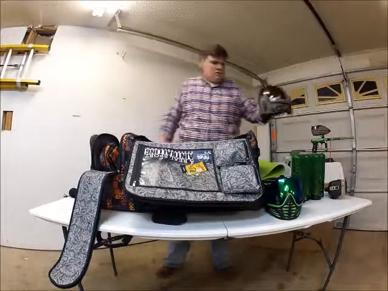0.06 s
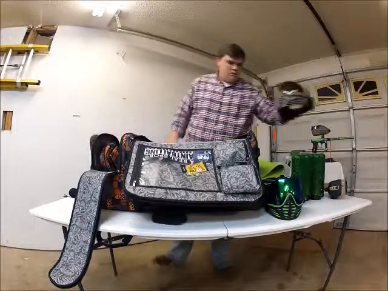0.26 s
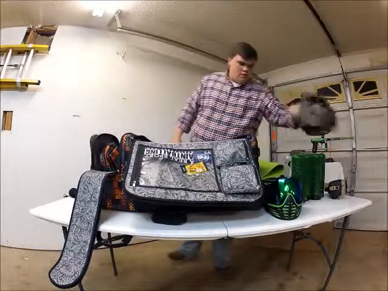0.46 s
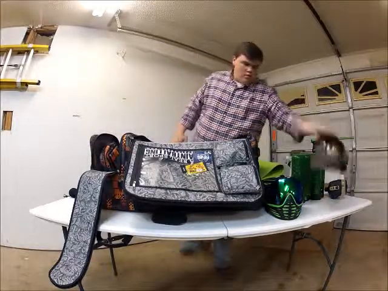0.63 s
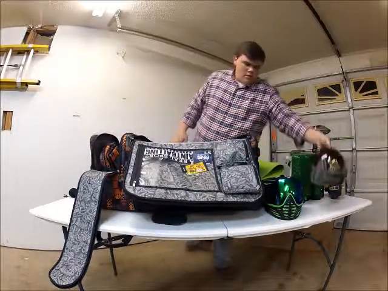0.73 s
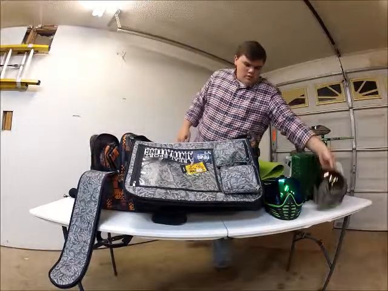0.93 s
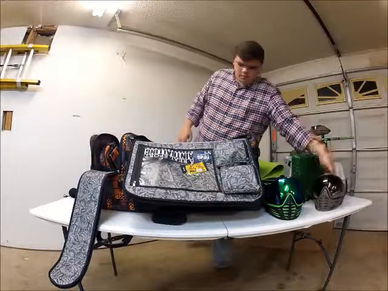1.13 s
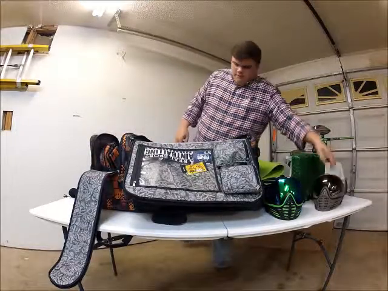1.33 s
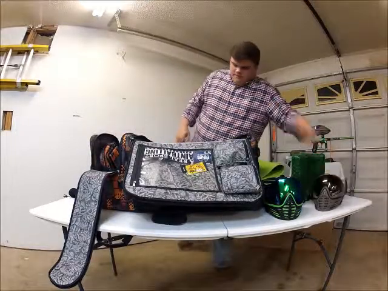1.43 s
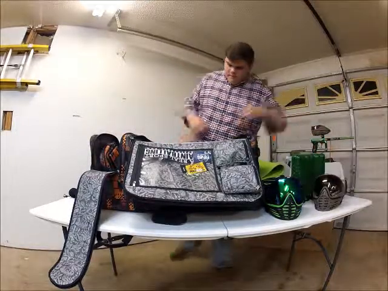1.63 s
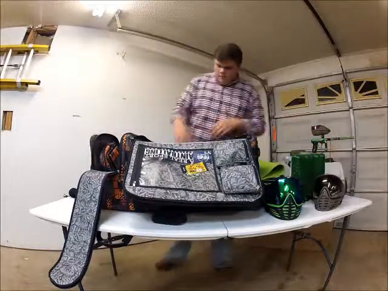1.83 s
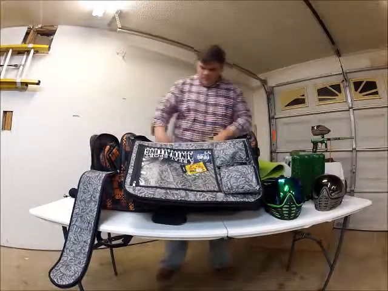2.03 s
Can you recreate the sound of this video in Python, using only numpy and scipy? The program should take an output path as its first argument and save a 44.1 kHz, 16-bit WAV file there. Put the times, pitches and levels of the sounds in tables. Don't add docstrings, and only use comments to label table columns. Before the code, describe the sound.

Single sharp clack and deep hollow boom as a plastic shell is set on a table.

```python
import sys
import numpy as np
from scipy import signal
from scipy.fft import rfft, irfft, next_fast_len
from scipy.io import wavfile
from scipy.ndimage import uniform_filter1d

SR = 44100
rng = np.random.default_rng(int(sys.argv[2]) if len(sys.argv) > 2 else 0)


def nominal_scale(level):
    x = np.asarray(level, float) / 20
    return 10 ** x


def bounce(signal):
    frames = np.transpose(np.atleast_2d(signal))
    limited = np.clip(frames, -1, 1)
    pcm = np.round(limited * 32767).astype(np.int16)
    wavfile.write(sys.argv[1], SR, pcm)


N = 91287


def read(points, hz):
    f, value = np.transpose(points)
    return np.interp(np.log(hz + 1), np.log(f + 1), value)


def evened(x):
    return x / np.sqrt(np.mean(x ** 2) + 1e-20)


def since(start_s):
    return np.maximum(np.arange(N) / SR - start_s, 0)


def ring(t, pitch_hz, level_db, t60_s):
    return nominal_scale(level_db - 60 * t / t60_s) * np.sin(2 * np.pi * pitch_hz * t)


def noise(field_db, size=512):
    frames = N * 4 // size + 5
    hz = np.fft.rfftfreq(size, 1 / SR)[:, None]
    t = np.arange(frames) * size / 4 / SR
    real, imag = rng.standard_normal((frames, len(hz), 2)).T
    spectra = (real + 1j * imag) * nominal_scale(field_db(hz, t))
    return signal.istft(spectra, nperseg=size, noverlap=size * 3 // 4)[1][:N]


def patches(hz, t, bins=6, frames=8):
    lumps = rng.standard_normal((len(t), len(hz))).T
    lumps = uniform_filter1d(lumps, int(bins), 0)
    return evened(uniform_filter1d(lumps, int(frames), 1))


# frequency_hz, density_db (per Hz)
AIR_COLOUR = [(12, -58.5), (20, 0), (248, -6), (305, -9), (367, -9), (532, -13.5), (597, -16), (992, -23.5),
              (5000, -30), (6500, -29), (11000, -120)]
# pitch_hz, level_db
HUM_PARTIALS = [(120, -72), (362, -75), (720, -81.5), (1800, -86), (2040, -86)]


def air():
    def field(hz, t):
        low_lumps = 2.7 * patches(hz, t, 6.4, 3.3) * (hz < 700)
        return read(AIR_COLOUR, hz) + low_lumps + 0.81 * patches(hz, t, 30, 12)

    rumble = nominal_scale(-58.5) * evened(noise(field, size=1024))
    t = np.arange(N) / SR
    hum = np.zeros(N)
    for pitch_hz, level_db in HUM_PARTIALS:
        waver_db = 1.86 * np.sin(2 * np.pi * (rng.uniform(1.0, 2.32) * t + rng.random()))
        hum += nominal_scale(level_db + 3.5 + waver_db) * np.sin(2 * np.pi * pitch_hz * t)
    return rumble + hum


# time_s, level_db
MOVEMENT = [(0, -59), (.1, -61), (.25, -58), (.33, -65.5), (.39, -61.5), (.46, -69.5), (.6, -69.5),
            (.8, -69), (.95, -66), (1.08, -63), (1.4, -72), (1.8, -72), (1.97, -68.5), (2.07, -61)]
# frequency_hz, density_db (per Hz)
CLOTH_COLOUR = [(300, -39.5), (800, -9.5), (1600, -12.5), (2500, -11.5), (3500, -13.5), (5000, -14.5)]


def rustle():
    def field(hz, t):
        return read(CLOTH_COLOUR, hz) - 30 * (hz < 200) + 1.5 * patches(hz, t, 5, 10)

    level_db = np.interp(np.arange(N) / SR, *np.transpose(MOVEMENT))
    return nominal_scale(level_db) * evened(noise(field))


# start_s, level_db, pitch_hz, t60_s
SOFT_KNOCKS = [
    (.118, -43.5, 246, 0.052),
    (1.937, -49.5, 236, 0.15),
    (2.0249, -39.5, 164, 0.14),
    (2.026, -41.5, 293, 0.088),
    (2.031, -42, 231, 0.14),
    (2.0577, -37, 150, 0.074),
]


def knocks():
    direct = np.zeros(N)
    for start_s, level_db, pitch_hz, t60_s in SOFT_KNOCKS:
        onset = np.minimum(since(start_s) / 0.0029, 1)
        direct += onset * ring(since(start_s), pitch_hz, level_db, t60_s)
    t = np.arange(SR // 2) / SR
    room = rng.standard_normal(len(t)) * nominal_scale(-60 * t / 0.62) * (t > .006)
    room = room / np.linalg.norm(room)
    return direct + nominal_scale(-8) * signal.fftconvolve(direct, room)[:N]


# start_s, rise_s, t60_s, level_db, centre_hz
RUBS = [
    (.184, .014, .22, -61.5, 4500),
    (2.028, .008, 1.5, -62, 2330),
    (2.0255, .006, 1.5, -62, 4000),
    (.55, .4, 1.2, -73, 1550),
]
RUB_WIDTHS = [.15, .1, .45, .2]


def scuffs():
    out = np.zeros(N)
    for (start_s, rise_s, t60_s, level_db, centre_hz), width in zip(RUBS, RUB_WIDTHS):
        hiss = noise(lambda hz, t: -6 * (np.log((hz + 1) / centre_hz) / width) ** 2, size=256)
        swell = np.minimum(since(start_s) / rise_s, 1)
        out += swell * nominal_scale(level_db - 60 * since(start_s + rise_s) / t60_s) * evened(hiss)
    return out


# start_s, level_db
RIM_CONTACTS = [
    (1.0851, -30),
    (1.0863, -30),
    (1.0874, -21),
    (1.0885, -25),
]


def ticks():
    out = np.zeros(N)
    for start_s, level_db in RIM_CONTACTS:
        t = since(start_s)
        crack = nominal_scale(level_db - 4 - 60 * t / .008) * rng.standard_normal(N)
        shell = ring(t, 1300, level_db, .006) + ring(t, 3200, level_db - 3, .006)
        out += (t > 0) * (crack - shell)
    return out


# frequency_hz, density_db (per Hz)
TAIL_COLOUR = [(300, -6), (400, -20.5), (560, -13), (750, -26), (1200, -26), (1800, -28.5), (3000, -26.5),
               (5200, -38)]
# frequency_hz, t60_s
TAIL_DECAY = [(300, 0.6), (600, 0.54), (1200, 0.58), (2500, 0.49), (5000, 0.52)]


def tail():
    start_s = RIM_CONTACTS[0][0]

    def field(hz, t):
        decay_db = -60 * np.maximum(t - start_s, 0) / read(TAIL_DECAY, hz)
        bass_lag_db = -13.5 * (hz < 480) * (t < start_s + .025)
        return read(TAIL_COLOUR, hz) - 40 * (hz < 250) + decay_db + bass_lag_db + patches(hz, t, 10, 3.5)

    diffuse = noise(field)
    diffuse = diffuse / np.sqrt(np.mean(diffuse[round(start_s * SR):][:2000] ** 2))
    t = since(start_s)
    rise = np.minimum(t / 0.0044, 1)
    early = 1 + nominal_scale(-39 - 60 * t / 0.064)
    return nominal_scale(-31) * rise * early * diffuse


# pitch_hz, level_db, t60_s
TOP_MODES = [(150.1, 0, .156), (268.9, -6.5, .118), (342.8, -12.6, .28), (590, -23, .12)]
# pitch_hz, level_db, t60_s
ROOM_MODES = [(94.1, -5.1, .43), (133.1, 6.9, .47), (137.1, -8.1, 1.14), (159.9, -.7, .94),
              (170.4, 2, 1.03), (182, 3.2, 1.12), (185.6, 7.4, 1.2), (213.5, 9.4, 1.18), (224.1, 5.9, 1.14),
              (236.6, 9.1, 1.05), (249.3, -2.1, 1.2), (262.5, -7.9, .58), (279.6, -6.4, .83)]
ROOM_SIGNS = [-1, -1, 1, -1, -1, -1, 1, 1, -1, 1, 1, 1, -1]


def boom():
    push_s, build_s = .0015, .008
    t = np.arange(SR) / SR
    push = np.sin(np.pi * np.minimum(t / push_s, 1))[:400] ** 2
    modes = sum(ring(t, *mode) for mode in TOP_MODES)
    top = signal.fftconvolve(modes, push / push.sum())[:SR]
    top = signal.sosfilt(signal.butter(3, 85, "high", fs=SR, output="sos"), top)
    late = np.maximum(t - .0003, 0)
    waves = sum(sign * ring(late, *mode) for sign, mode in zip(ROOM_SIGNS, ROOM_MODES))
    waves = waves * nominal_scale(-20.3 * (late / .3) ** 2)
    sound = top + signal.fftconvolve(top, waves)[:SR] / (build_s * SR)
    return -nominal_scale(-14.1) * np.interp(since(1.0871), t, sound, right=0)


def scene():
    return (air() + rustle() + knocks() + scuffs() + ticks() + tail() + boom())[None]


def roll_off(x):
    return signal.sosfilt(signal.butter(12, 16430, fs=SR, output="sos"), x)


def record(dry):
    rate_hz, guard_hz, edge_hz = 12000, 5336, 15400
    guarded = signal.sosfilt(signal.butter(16, guard_hz, fs=SR, output="sos"), dry)
    combed = guarded * (1 + 2 * np.cos(2 * np.pi * rate_hz * np.arange(N) / SR))
    size = next_fast_len(N + 2048)
    hz = np.fft.rfftfreq(size, 1 / SR)
    hold = np.sinc(hz / rate_hz) * (hz < edge_hz)
    held = irfft(rfft(combed, size) * hold, size)[:, :N]
    return roll_off(held)


dry = scene()
out = record(dry)
bounce(out)
```